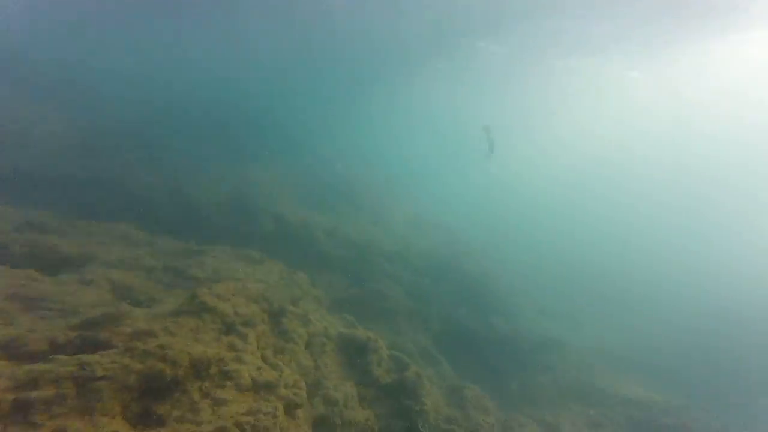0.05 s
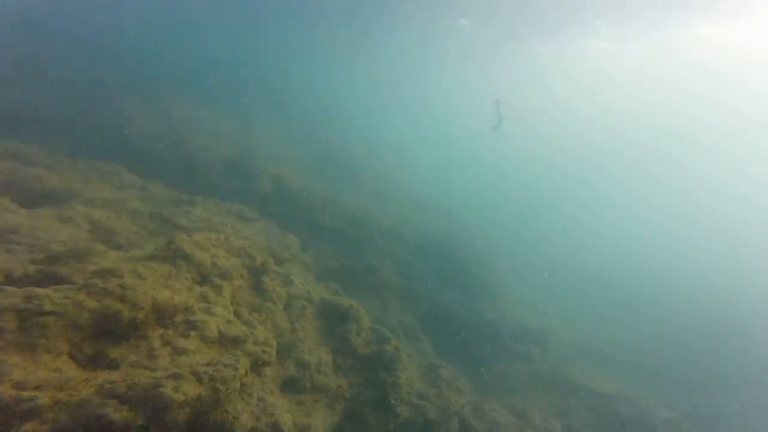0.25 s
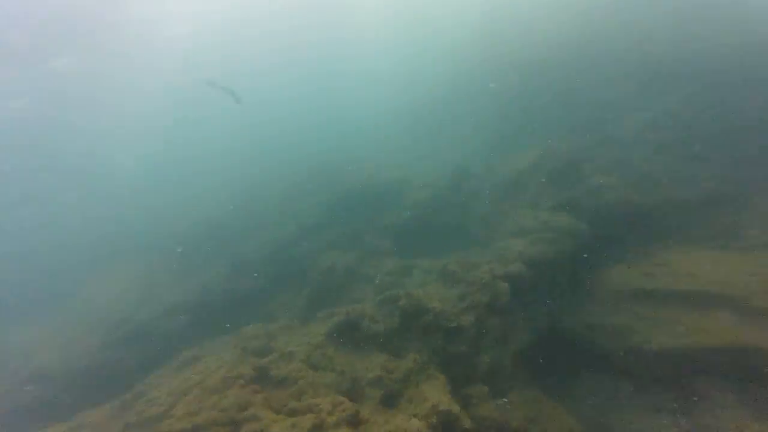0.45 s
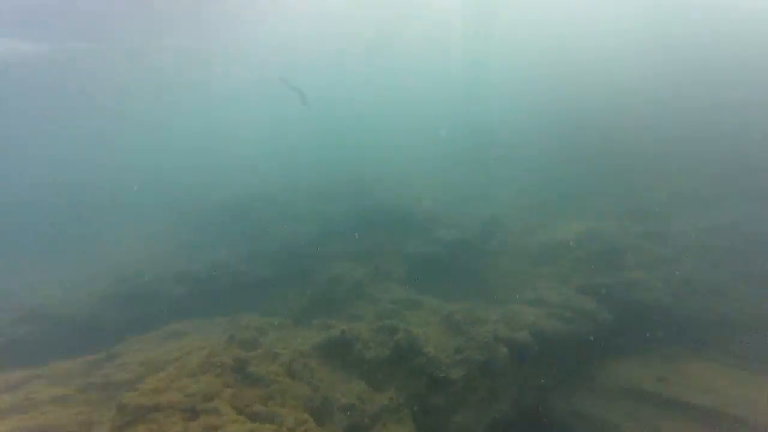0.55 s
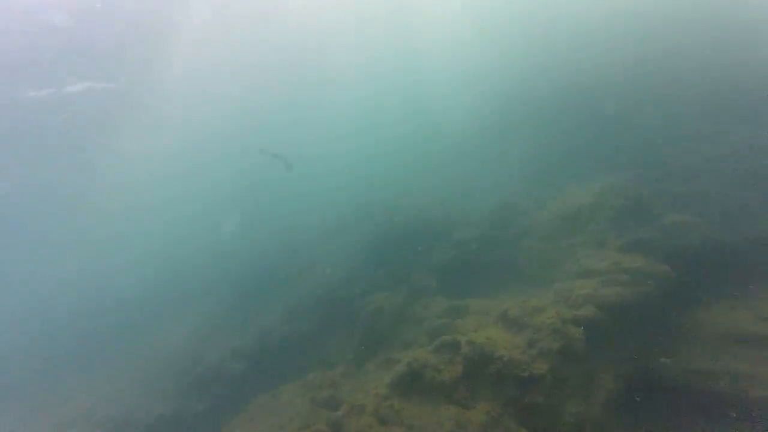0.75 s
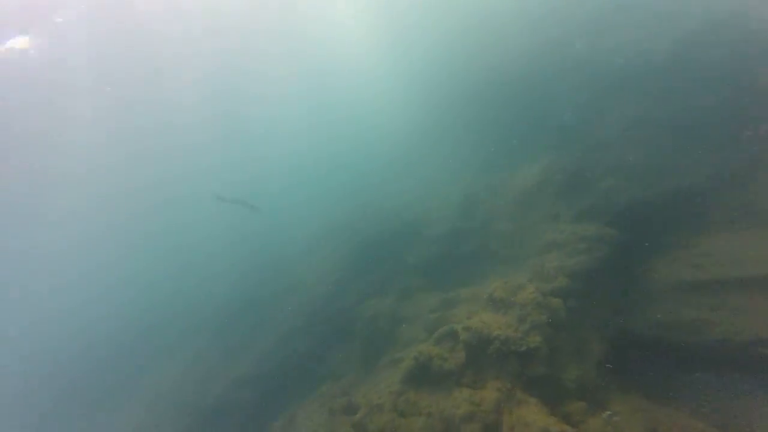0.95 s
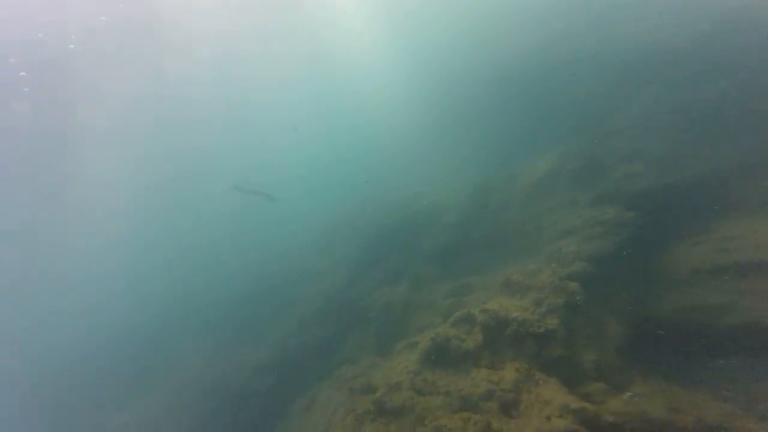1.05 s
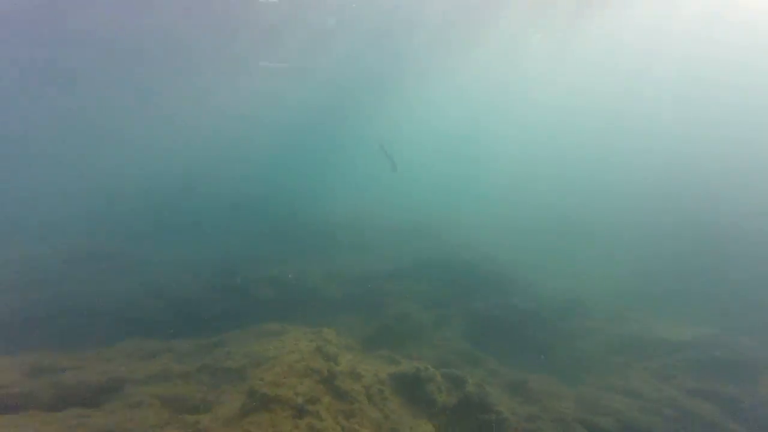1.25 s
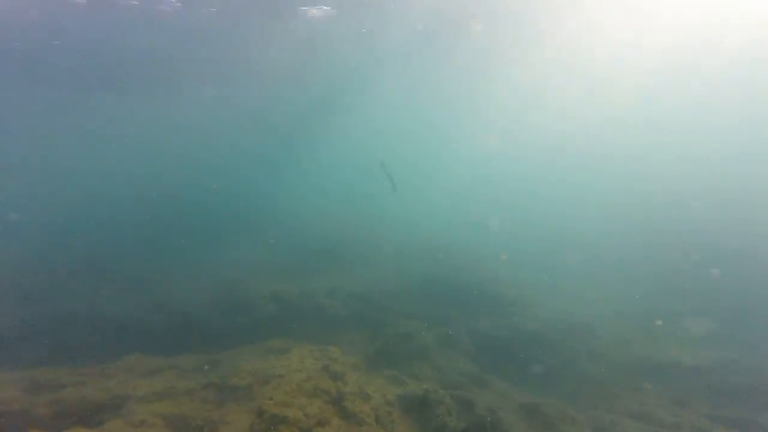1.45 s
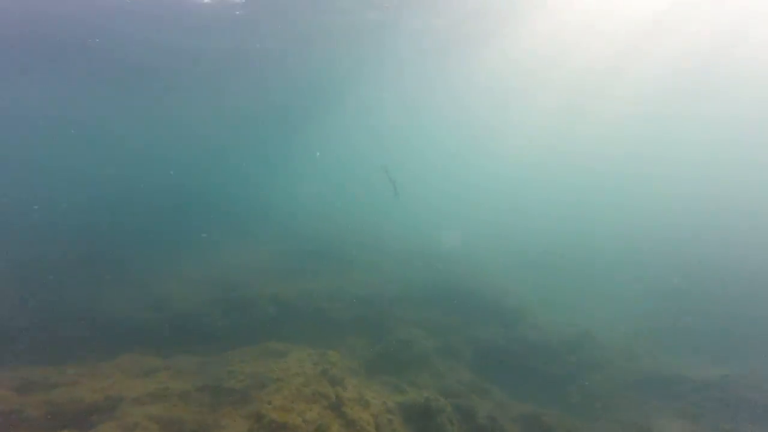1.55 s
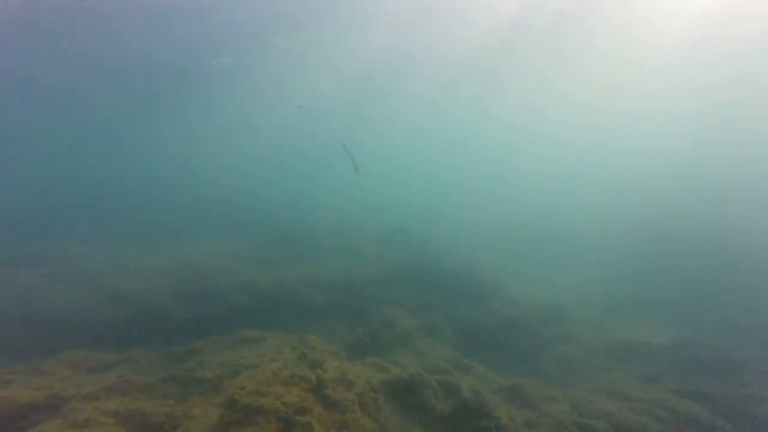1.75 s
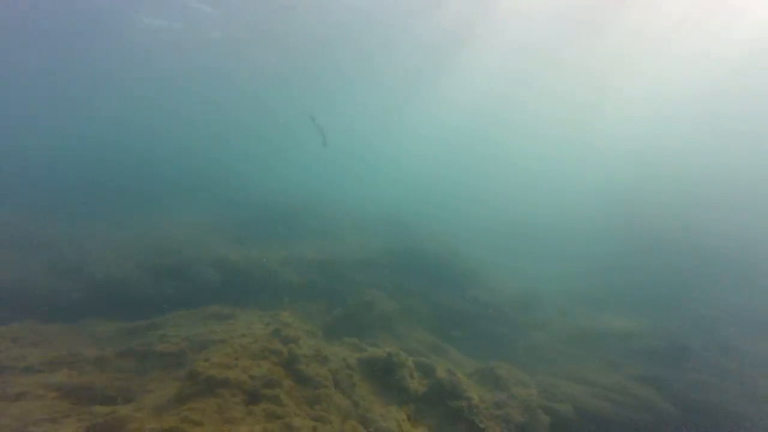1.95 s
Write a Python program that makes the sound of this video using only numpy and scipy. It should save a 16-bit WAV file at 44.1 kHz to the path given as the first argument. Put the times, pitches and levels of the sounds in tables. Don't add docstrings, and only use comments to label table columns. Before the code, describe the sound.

Knocks on a hand-held plastic camera housing under water, heard close from inside. Quiet low sway and faint hiss with small bumps near 0.2 s; at 0.4-0.56 s a very loud, dense clatter of thumps, hollow knocks and creaking rub. The hiss dips, then slowly recovers. Softer bumps come around 0.8 and 1.0 s, a scrape and ticks at 1.2-1.3 s, then sparse faint taps and crackle to 2 s.

```python
import sys
import numpy as np
from scipy import signal
from scipy.fft import rfft, irfft, next_fast_len
from scipy.io import wavfile
from scipy.ndimage import uniform_filter1d, map_coordinates

SR = 44100
rng = np.random.default_rng(int(sys.argv[2]) if len(sys.argv) > 2 else 0)


def unload_wav(signal):
    wavfile.write(
        sys.argv[1],
        SR,
        np.round(np.clip(np.atleast_2d(signal).T, -1, 1) * 32767).astype(np.int16),
    )


def how_loud(loudness_db):
    steps = np.asarray(loudness_db, float) / 20
    return 10 ** steps


N = 88200
T = np.arange(N) / SR

# (time [s], peak [dB], sway frequency [Hz], T60 [s])
SHOVES = [(.012, -24.5, 34.8, 0.4), (.072, -17, 26.5, 0.26), (.225, -14.5, 27.8, 0.3), (.345, -19, 35, 0.6),
          (.385, -19, 23, 0.052), (.408, 1.5, 39, 0.1), (.441, -2, 39, 0.1), (.776, -16.5, 38.3, 0.53),
          (.872, -10, 23.3, 0.58), (1.212, -13, 13.3, 0.36), (1.257, -9.5, 25.6, 0.2),
          (1.375, -22, 26.7, 0.6), (1.425, -9.5, 26.8, 0.36), (1.555, -17, 18, 0.35), (1.63, -24, 24, 0.42),
          (1.82, -35.5, 23, 0.29)]
# (time [s], level [dB])
GRIP_PRESSURE = [(0, -40.5), (.13, -51.5), (.3, -55), (.39, -35), (.43, -17), (.47, -14), (.53, -24),
                 (.555, -13.5), (.575, -41.5), (.74, -39.5), (.83, -31), (.9, -42.5), (.995, -39),
                 (1.025, -36), (1.27, -37), (1.33, -42), (1.5, -45.5), (2, -68)]
# (frequency [Hz], density [dB per Hz])
RUB_SPECTRUM = [(24, -86), (40, -6), (118, -1.5), (165, -9), (386, -16), (650, -30.5), (712, -35),
                (900, -31), (1170, -27), (1980, -120)]
# (frequency [Hz], width [Hz], level [dB])
SHELL_MODES = [(980, 122, -5.5), (1674, 144, -8.5), (2400, 204, -15), (3030, 320, -23.5), (3950, 79, -25)]
# (frequency [Hz], density [dB per Hz])
HISS_SPECTRUM = [(70, -2), (200, -9), (700, -15), (1000, -16), (3200, -15), (4400, -26), (5000, -27.5),
                 (15000, -44.5)]
# (frequency [Hz], width [Hz], height [dB])
HISS_PEAKS = [(1030, 85, 9.5), (1940, 290, 5), (2450, 167, 4), (3030, 185, 8.5), (4074, 140, 12.5),
              (5940, 140, 5), (8100, 500, 7.5)]
# (start [s], length [s], level [dB])
SCRAPES = [
    (0.106, 0.12, -51),
    (0.847, 0.16, -48),
    (1.01, 0.033, -47),
    (1.202, 0.09, -44),
    (1.39, 0.08, -49),
]
# (time [s], peak [dB], frequency [Hz], T60 [s])
THUMPS = [(.159, -28.5, 308, 0.01), (.16, -34, 89, 0.075), (.187, -41.5, 410, 0.053),
          (.195, -24, 152, 0.088), (.3985, -4.5, 106, 0.022), (.404, -13.5, 378, 0.035),
          (.426, -3, 117, 0.033), (.432, -23, 200, 0.0083), (.4365, -3, 192, 0.035),
          (.4465, -25, 305, 0.015), (.4505, -13, 348, 0.06), (.4595, 1.5, 300, 0.0083),
          (.4695, -7, 323, 0.03), (.479, -4, 320, 0.014), (.491, -2, 258, 0.0083), (.5438, 7.5, 290, 0.012),
          (.5465, -5.5, 110, 0.02), (.551, -8, 306, 0.034), (.675, -36, 575, 0.013),
          (.754, -28, 557, 0.014), (.803, -24.5, 405, 0.06), (.807, -28, 496, 0.019),
          (.812, -14, 98.4, 0.17), (.819, -19, 330, 0.035), (.832, -30, 344, .025),
          (.854, -21.5, 307, 0.024), (.876, -29, 307, 0.038), (1.008, -31.5, 436, 0.14),
          (1.0135, -16, 198, 0.067), (1.016, -27, 479, 0.066), (1.0235, -24.5, 423, 0.087),
          (1.04, -20.5, 278, 0.055), (1.075, -25, 110, 0.19), (1.115, -24.5, 70, 0.5), (1.16, -32, 55, 0.3),
          (1.105, -34, 260, 0.04), (1.183, -27.5, 298, 0.022), (1.19, -28.5, 109, 0.15),
          (1.229, -19.5, 170, 0.054), (1.385, -37, 177, 0.022), (1.43, -35, 294, 0.062),
          (1.496, -26.5, 415, 0.021), (1.505, -37, 298, 0.11), (1.53, -31, 89.2, 0.243)]
# (time [s], dull part [dB], bright part [dB])
TICKS = [(0.271, -62, -46), (.362, -33.5, -63), (0.404, -22, -35.5), (0.4087, -27, -20.5),
         (0.424, -50, -37), (0.431, -32, -37), (.4365, -50, -40), (0.4503, -29, -33), (.4635, -49, -47),
         (0.4709, -21.5, -43), (0.476, -47, -36), (0.482, -34, -31), (0.487, -33, -28), (.500, -28, -75),
         (0.5123, -35, -62), (0.521, -35, -76), (0.5415, -21.5, -43), (0.5441, -37, -26),
         (0.55, -38, -28.5), (0.667, -43, -45), (0.788, -35.5, -40), (0.826, -35, -36.5),
         (0.8561, -29.5, -41), (0.906, -33, -39), (.947, -39.5, -43.5), (1.158, -39.5, -43),
         (1.196, -45, -49.5), (1.2745, -33, -50), (1.284, -34, -53), (1.2974, -25.5, -34.5),
         (1.351, -43, -47), (1.5868, -36.5, -73), (1.601, -44, -36), (1.892, -66, -46)]
# (frequency [Hz], density [dB per Hz])
TICK_DULL_SPECTRUM = [(1300, -2), (2000, 8.5), (3200, 5), (4400, -2), (5500, -49)]
# (frequency [Hz], density [dB per Hz])
TICK_BRIGHT_SPECTRUM = [(3600, 0.5), (5000, -6.5), (6300, -3.5), (8200, -9.5), (11000, -20), (13500, -32),
                        (15500, -42)]
# (time [s], peak [dB], frequency [Hz], T60 [s])
KNOCKS = [(.403, -1, 1000, 0.023), (.4078, 7, 1058, 0.013), (.418, -25, 1770, 0.026),
          (.432, -24, 990, 0.021), (.4445, -22, 1600, 0.033), (.449, -22, 1630, .02),
          (.449, -15, 960, 0.022), (.4555, -21, 2870, 0.016), (.4563, -4.5, 1576, 0.015),
          (.4595, -11, 1570, 0.011), (.4705, 2, 1620, 0.021), (.4715, -13, 2920, 0.0091),
          (.479, -25, 1620, .02), (.4885, -10, 1045, 0.014), (.49, -20.5, 2480, 0.013),
          (.501, -24, 2160, 0.011), (.5125, -15.5, 1990, 0.017), (.5235, -13, 1940, 0.012),
          (.548, -3.5, 1093, 0.01), (.500, -8, 1000, 0.015), (.5125, -10, 1026, 0.017),
          (.5215, -7, 1050, 0.012), (.5285, -8, 1000, 0.015), (.5345, -18, 1050, 0.027),
          (.5408, -0.5, 1610, 0.012), (.5575, -21, 1000, .022), (.755, -26.5, 1260, 0.014),
          (.787, -29, 1960, 0.012), (.803, -31, 1060, 0.014), (.809, -43, 1150, 0.018),
          (.816, -25, 1077, 0.027), (.822, -12.5, 1000, 0.011), (.832, -11.5, 980, 0.01),
          (.854, -18.5, 1056, 0.017), (.876, -22.5, 1050, 0.012), (1.0135, -30, 1130, 0.02),
          (1.019, -20.5, 1100, 0.02), (1.019, -39.5, 2200, 0.042), (1.028, -26.5, 1135, 0.027),
          (1.035, -32, 1214, 0.024), (1.105, -39.5, 980, .04), (1.245, -41, 2130, .05),
          (1.262, -37.5, 1430, 0.084), (1.272, -31.5, 1000, 0.033), (1.274, -32, 1750, 0.04),
          (1.2985, -22, 3250, 0.0075), (1.298, -20, 1896, 0.012), (1.381, -36, 2600, 0.019),
          (1.42, -37.5, 1920, 0.028), (1.434, -31, 2400, 0.015), (1.497, -35, 980, 0.029),
          (1.587, -36.5, 1960, 0.02), (1.719, -39, 1890, 0.059), (1.758, -33, 1810, 0.014),
          (1.911, -26.5, 1920, 0.01),
          (0.4117, -17, 3100, 0.0089), (0.4721, -21.5, 3720, .012), (.481, -27.5, 2930, 0.027),
         (0.5417, -22.5, 2976, 0.016), (1.2982, -26.5, 2400, 0.012), (1.299, -33.5, 4250, .012),
         (1.5867, -29.5, 2450, 0.017), (1.731, -36, 2030, 0.018), (1.911, -30.5, 2380, 0.015)]

SLOSH_DB, SLOSH_FADE_DB_PER_S = -31, 2
SLOSH_HZ, SLOSH_WIDTH_HZ = 24.4, 11
RUB_DB, RUB_LUMPS_DB = -2, 2.5
CREAK_DB, CREAK_DB_PER_PRESSURE_DB = -12, 1.36
CREAK_GRAINS_PER_S, SHELL_TOP_HZ = 1800, 4380
HISS_DB, HISS_PATCHES_DB = -49, 2.5
DUCK_DB, DUCK_START_S, DUCK_HOLD_END_S, DUCK_RECOVERY_S = -7.5, .41, .56, 0.44
DULL_T60_S, BRIGHT_T60_S, TICK_RISE_S = 0.019, 0.011, 0.00077
FAR_TICKS_PER_S, FAR_DB, FAR_BRIGHT_DB, FAR_SPREAD_DB = 30, -55, -11, 2.5
THUMP_ROUGHNESS, KNOCK_ROUGHNESS = .15, .22
SHOVE_RISE_CYCLES, THUMP_RISE_CYCLES, KNOCK_RISE_CYCLES = 0.13, 0.29, 1.73
LOW_CUT_HZ, LIMIT, KNEE = 10, .92, 6


def unit(x):
    return x / np.sqrt(np.mean(x ** 2) + 1e-20)


def along(points, hz):
    f, db = np.transpose(points)
    return how_loud(np.interp(np.log(hz + 1), np.log(f + 1), db, left=-120, right=-120))


def wobble(knots_per_s):
    knots = rng.standard_normal(int(N * knots_per_s / SR) + 4)
    return map_coordinates(knots, [T * knots_per_s])


def filtered(x, response):
    m = next_fast_len(N + SR // 2)
    hz = np.fft.rfftfreq(m, 1 / SR)
    return irfft(rfft(x, m) * response(hz), m)[..., :N]


def resonances(modes):
    def response(f):
        total = 0
        for k, (center, width, db) in enumerate(modes):
            damping = 1j * f * width
            total = total + (-1) ** k * how_loud(db) * damping / (center * center - f * f + damping)
        return total
    return response


def noise(response):
    return unit(filtered(rng.standard_normal(N), response))


def after(start_s, t60_s, rise_s):
    t = np.maximum(T - start_s, 0)
    return how_loud(-60 * t / t60_s) * (1 - np.exp(-(t / rise_s) ** 2))


def rings(rows, rise_cycles):
    out = np.zeros(N)
    for start_s, db, hz, t60_s in rows:
        span = slice(int(start_s * SR), int((start_s + 2 * t60_s) * SR))
        t = np.maximum(T[span] - start_s, 0)
        rise = 1 - np.exp(-(t * hz / rise_cycles) ** 2)
        out[span] += how_loud(db - 60 * t / t60_s) * rise * np.sin(2 * np.pi * hz * t)
    return out


def sway():
    mode = resonances([(SLOSH_HZ, SLOSH_WIDTH_HZ, 0)])
    slosh = noise(lambda f: mode(f) ** 2)
    return rings(SHOVES, SHOVE_RISE_CYCLES) + how_loud(SLOSH_DB - SLOSH_FADE_DB_PER_S * T) * slosh


def grip():
    pressure_db = np.interp(T, *np.transpose(GRIP_PRESSURE))
    rub = unit(how_loud(RUB_LUMPS_DB * wobble(40.78)) * noise(lambda f: along(RUB_SPECTRUM, f)))

    slips = rng.random(N) < CREAK_GRAINS_PER_S / SR
    grains = slips * rng.standard_normal(N) * how_loud(2.4 * wobble(62.0))
    friction = grains + 0.021 * rng.standard_normal(N)
    shell = resonances(SHELL_MODES)
    creak = unit(filtered(friction, lambda f: shell(f) / (1 + (f / SHELL_TOP_HZ) ** 8)))

    top_db = pressure_db.max()
    creak_db = top_db + CREAK_DB_PER_PRESSURE_DB * (pressure_db - top_db) + CREAK_DB
    return how_loud(pressure_db + RUB_DB) * rub + how_loud(creak_db) * creak


def hiss():
    def response(f):
        peaks_db = sum(db / (1 + ((f - center) / width) ** 2) for center, width, db in HISS_PEAKS)
        return along(HISS_SPECTRUM, f) * how_loud(peaks_db)

    z = signal.stft(noise(response), nperseg=512)[2]
    patches = uniform_filter1d(rng.standard_normal(z.shape), 6, 0)
    patches = unit(uniform_filter1d(patches, 8, 1))
    water = unit(signal.istft(z * how_loud(HISS_PATCHES_DB * patches), nperseg=512)[1][:N])
    recovery = np.exp(-np.maximum(T - DUCK_HOLD_END_S, 0) / DUCK_RECOVERY_S)
    duck_db = DUCK_DB * (T > DUCK_START_S) * recovery
    return how_loud(HISS_DB + duck_db + wobble(25.07)) * water


def scrapes():
    swell = np.zeros(N)
    for start_s, length_s, db in SCRAPES:
        swell += how_loud(db) * np.sin(np.pi * np.clip((T - start_s) / length_s, 0, 1))
    modes = [(1000, 68, 8.5), (1620, 150, 7.0), (2370, 160, 3.5), (3130, 230, 0.0)]  # Hz, width Hz, dB
    return swell * how_loud(2.5 * wobble(100)) * noise(resonances(modes))


def thumps():
    return (1 + THUMP_ROUGHNESS * wobble(250)) * rings(THUMPS, THUMP_RISE_CYCLES)


def ticks():
    dull = noise(lambda f: along(TICK_DULL_SPECTRUM, f))
    bright = noise(lambda f: along(TICK_BRIGHT_SPECTRUM, f))
    far = []
    for u, v, w in rng.random((2 * round(FAR_TICKS_PER_S), 3)):
        dull_db = FAR_DB - FAR_SPREAD_DB * np.log(v)
        bright_db = FAR_DB + FAR_BRIGHT_DB - FAR_SPREAD_DB * np.log(w)
        far.append((2 * u, dull_db, bright_db))

    out = np.zeros(N)
    for start_s, dull_db, bright_db in [*TICKS, *far]:
        out += after(start_s, DULL_T60_S, TICK_RISE_S) * how_loud(dull_db) * dull
        out += after(start_s, BRIGHT_T60_S, TICK_RISE_S) * how_loud(bright_db) * bright
    return out


def knocks():
    return (1 + KNOCK_ROUGHNESS * wobble(900)) * rings(KNOCKS, KNOCK_RISE_CYCLES)


def scene():
    return (sway() + grip() + hiss() + scrapes() + thumps() + ticks() + knocks())[None]


def band_limit(x):
    return signal.sosfilt(signal.butter(12, 15800, fs=SR, output="sos"), x)


def record(dry):
    x = filtered(dry, lambda f: 1j * f / (LOW_CUT_HZ + 1j * f))
    limited = x / (1 + np.abs(x / LIMIT) ** KNEE) ** (1 / KNEE)
    return band_limit(limited)


dry = scene()
out = record(dry)
unload_wav(out)
```